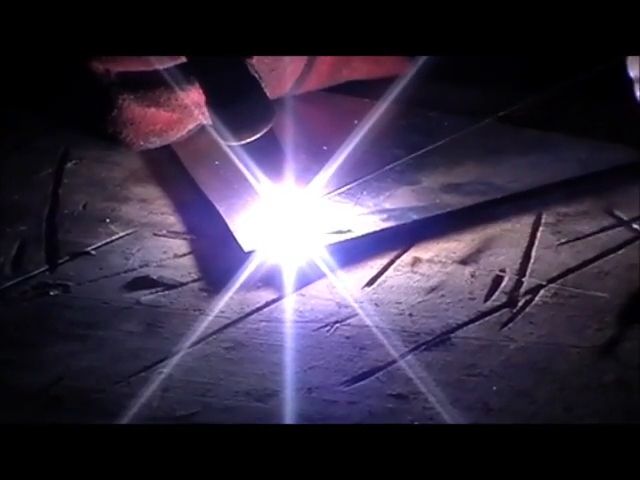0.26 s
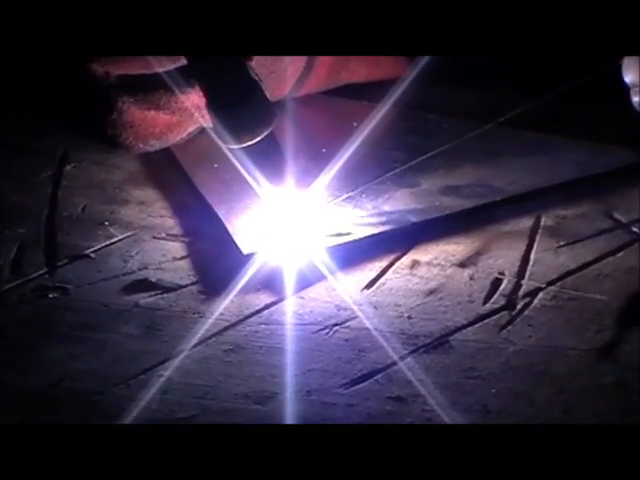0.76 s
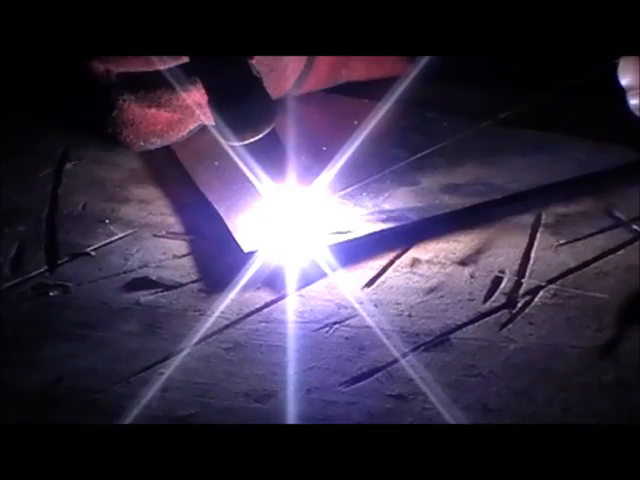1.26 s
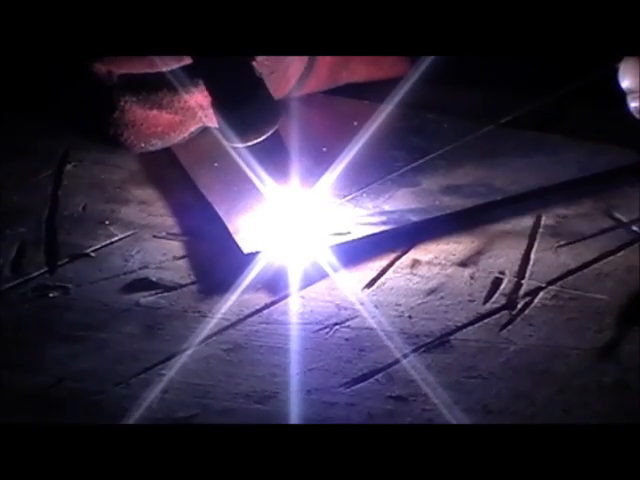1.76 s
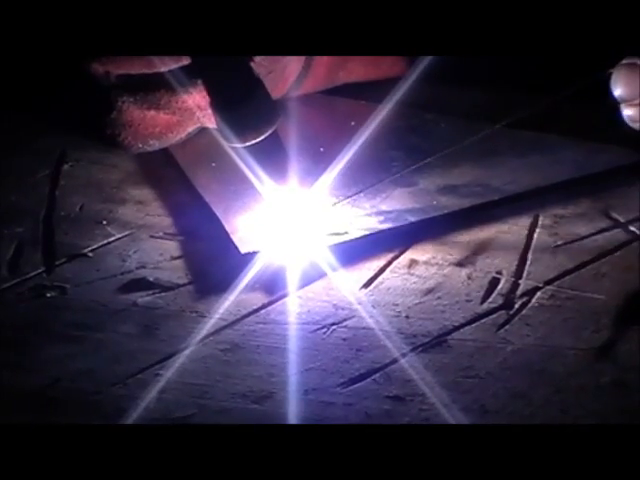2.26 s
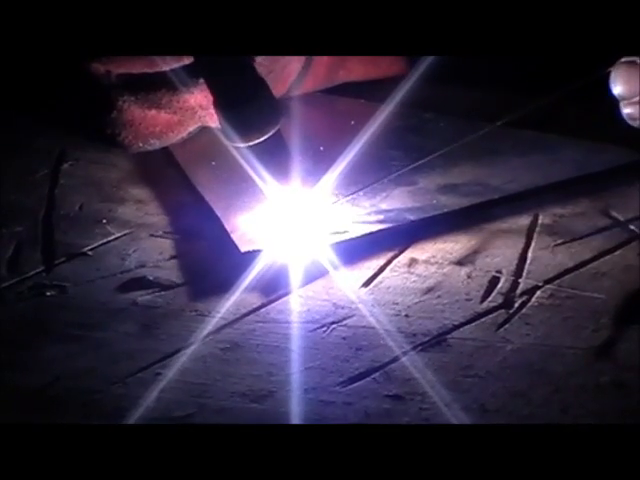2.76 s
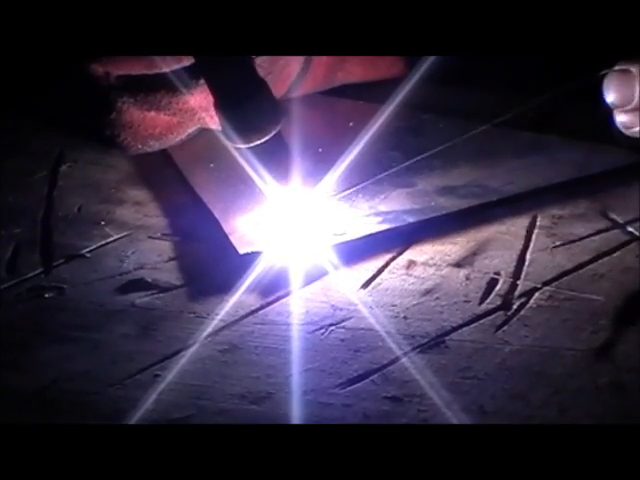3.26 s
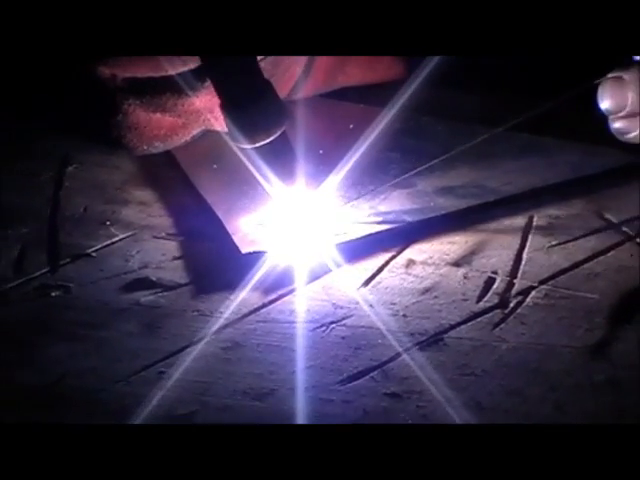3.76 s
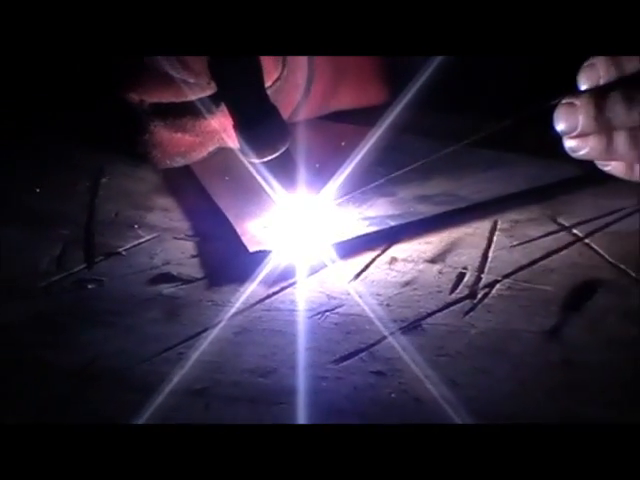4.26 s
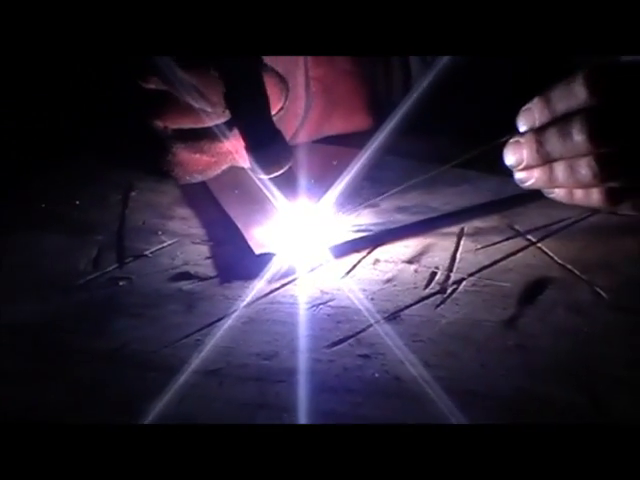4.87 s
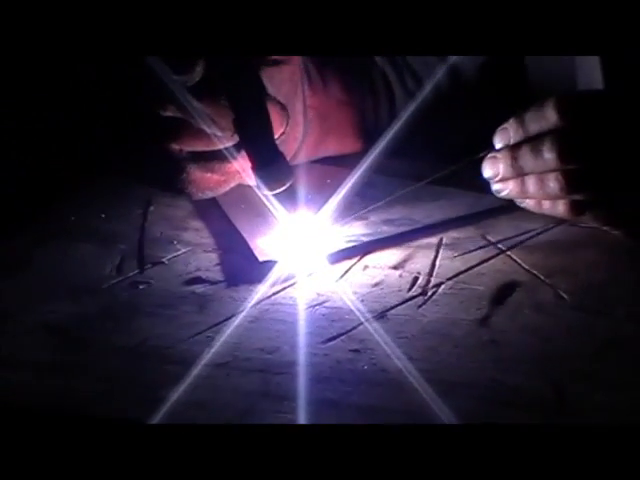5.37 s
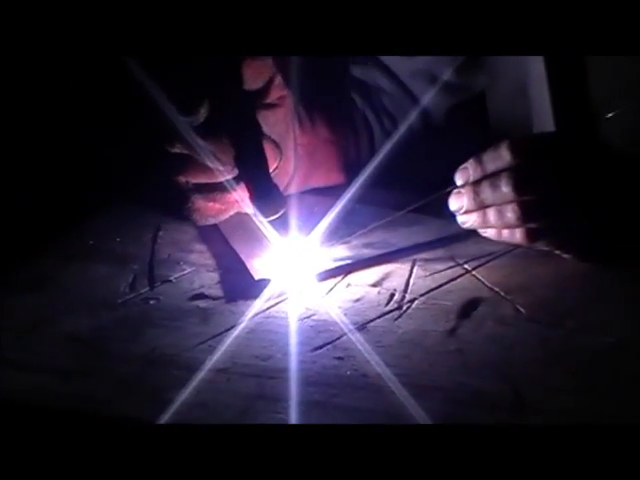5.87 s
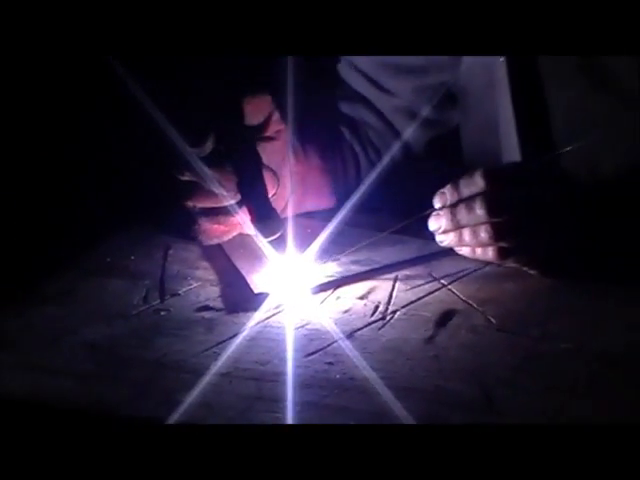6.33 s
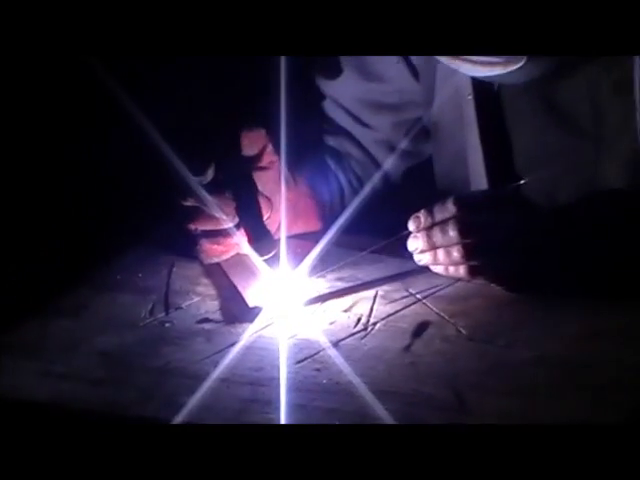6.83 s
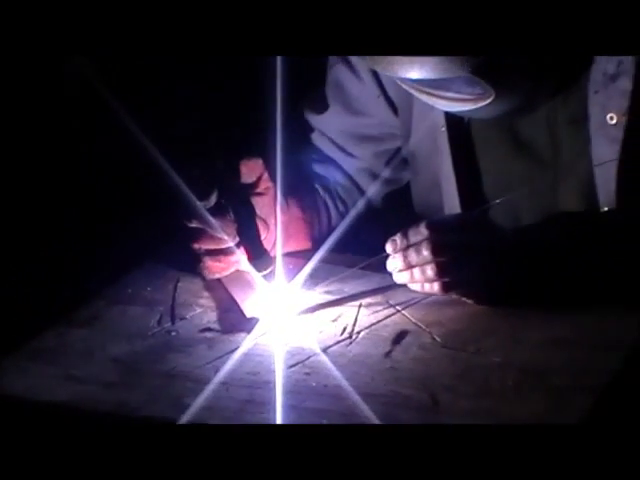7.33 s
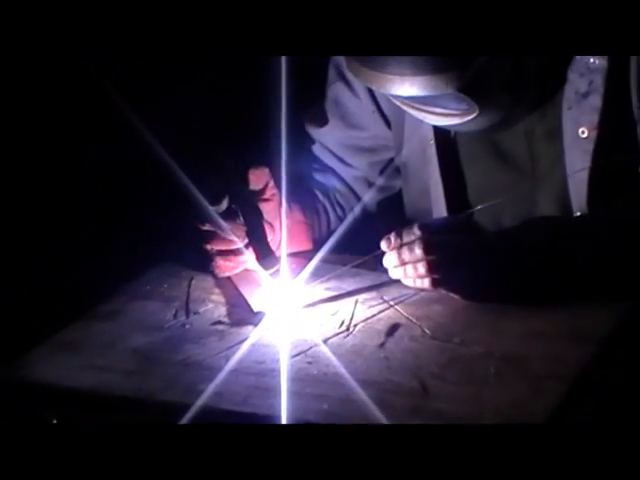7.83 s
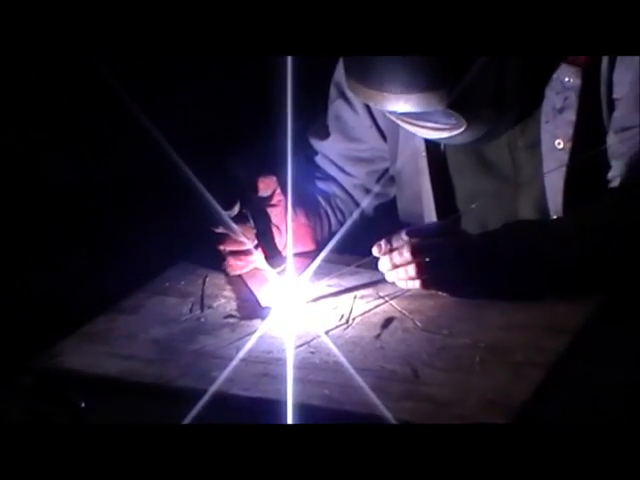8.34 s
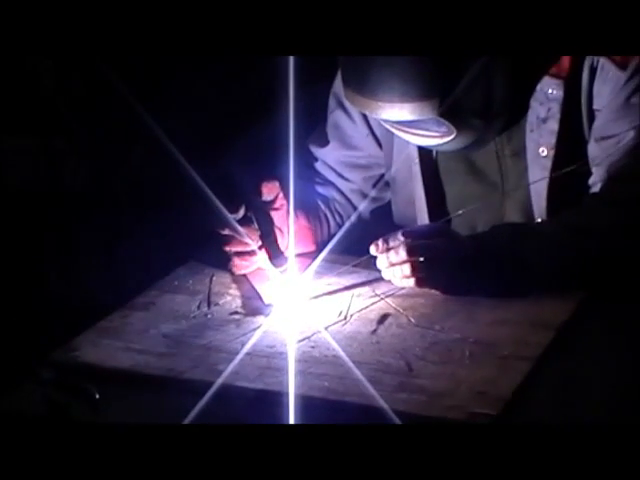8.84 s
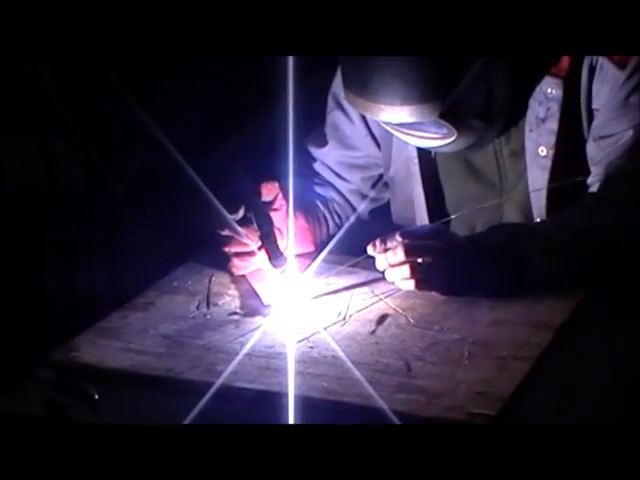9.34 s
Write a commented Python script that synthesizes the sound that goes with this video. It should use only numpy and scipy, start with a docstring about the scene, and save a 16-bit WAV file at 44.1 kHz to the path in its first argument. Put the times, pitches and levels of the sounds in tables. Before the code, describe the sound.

Already burning at the start and never stopping, a welding arc gives a loud, gritty electrical buzz with little deep bass and plenty of bright snap. It flutters gently several times a second, with scattered harder spits. Faint fan air and gas hiss lie below. The close stereo pickup is mostly centred, with short metallic workshop reverberation around it.

```python
"""An AC TIG arc buzzes on a steel bench in a workshop, heard close by in stereo.
From the start the welder's fan (shaped noise, unsteady tones) and shielding gas (shaped noise) run underneath.
The current reverses twice a cycle: first a bright, uneven crack with spark and sizzle re-lights the arc,
then two opposite edges give a steadier snap.
Bench and walls answer every pulse with decaying noise; standing waves set the low harmonics."""
import sys
import numpy as np
from scipy import signal
from scipy.fft import rfft, irfft, next_fast_len
from scipy.io import wavfile
from scipy.ndimage import map_coordinates

SR = 44100
rng = np.random.default_rng(int(sys.argv[2]) if len(sys.argv) > 2 else 0)


def log_audio(samples):
    """Write samples as a 16-bit WAV file to the path given in sys.argv[1]."""
    # one column per channel
    frames = np.atleast_2d(samples).T
    # limit to full scale, then quantise
    limited = np.clip(frames, -1, 1)
    pcm = np.round(limited * 32767).astype(np.int16)
    wavfile.write(sys.argv[1], SR, pcm)


N = 423360

ARC_HZ = 75.073
CRACK_AT_S = .00660  # re-ignition, from the start of the cycle

# relative spectrum of spark and sizzle: f/Hz, level/dB
SPARK_COLOUR = [(60, -69), (1000, -30), (3000, -17), (4800, -16.5), (5500, -4.5), (6100, -10), (6700, 2.5),
                (7300, 0.5), (8000, 2), (9500, -7.5), (15800, -30.5)]


def amp(db):
    """Amplitude factor of a level in dB."""
    return 10 ** (np.asarray(db) / 20)


def unit(x):
    """x scaled to rms 1."""
    return x / np.sqrt(np.mean(x ** 2) + 1e-20)


def along(points, hz):
    """(Hz, value) points interpolated on a log frequency axis."""
    f, v = np.transpose(points)
    return np.interp(np.log(hz + 1), np.log(f + 1), v)


def wobble(rate_hz):
    """A smooth random curve through rate_hz normal knots a second."""
    knots = rng.standard_normal(int(N * rate_hz / SR) + 4)
    return map_coordinates(knots, [np.arange(N) * rate_hz / SR])


def filtered(x, response):
    """x times a response of frequency."""
    m = next_fast_len(N + SR // 2)
    return irfft(rfft(x, m) * response(np.fft.rfftfreq(m, 1 / SR)), m)[..., :N]


def noise(spectrum):
    """Coloured noise of rms 1."""
    return unit(filtered(rng.standard_normal(N), lambda hz: amp(along(spectrum, hz))))


def pulses(times_s, sizes, colour, size=1024, order=8):
    """Sharp causal pulses of one colour, placed between samples; rms 1."""
    at = times_s[:, None] * SR
    taps = np.floor(at).astype(int) + np.arange(1 - order, order + 1)
    shape = np.sinc(taps - at) * np.sinc((taps - at) / order)  # windowed sinc
    weights = sizes[:, None] * shape
    train = np.bincount(np.clip(taps, 0, N).ravel(), weights.ravel(), N + 1)[:N]
    # folded cepstrum: minimum phase
    cepstrum = irfft(np.log(amp(along(colour, np.fft.rfftfreq(size, 1 / SR)))))
    cepstrum[1:size // 2] *= 2
    cepstrum[size // 2 + 1:] = 0
    pulse = irfft(np.exp(rfft(cepstrum)))
    return unit(signal.fftconvolve(train, pulse)[:N])


def fan(air_db, waver_hz, flutter_db):
    """The welder's cooling fan: rushing air and tones unsteady in pitch and level."""
    # relative noise density: f/Hz, level/dB
    air_spectrum = [(25, -29), (55, -26), (85, -33), (103, -3), (130, -18), (180, -4.5), (270, 1.5),
                    (400, -3.5), (640, 2.5), (900, -2), (1600, -0.5), (4000, -1), (16000, -38)]
    # tones: f/Hz, rms level/dB
    tone_levels = [(178, -60), (260, -44), (300, -73), (312, -66.5), (521.5, -50)]
    t = np.arange(N) / SR
    tones = np.zeros(N)
    for hz, db in tone_levels:
        level = amp(db + flutter_db * wobble(5.5))
        turns = hz * t + np.cumsum(waver_hz * wobble(5)) / SR
        tones += level * np.sin(2 * np.pi * turns)
    return amp(air_db) * noise(air_spectrum) + np.sqrt(2) * tones


def gas(hiss_db, flutter_db):
    """Shielding gas hisses through the hot arc: coloured noise of fluttering level."""
    # relative noise density: f/Hz, level/dB
    gas_spectrum = [(300, -30), (1000, -14.5), (1600, 3.5), (2800, 5), (4400, -5), (6500, 1), (8000, -26),
                    (10000, 1.5), (16000, -3.5)]
    return amp(hiss_db + flutter_db * wobble(12)) * noise(gas_spectrum)


def reluctance(cycle_s):
    """Force of each re-ignition (dB): throb, mains ripple, pool and scatter; now and then the arc catches hard."""
    # hardest re-ignitions: t/s, force against the usual/dB
    hard_cracks = [(0.047, 2), (0.726, 3), (1.165, 6), (1.578, 6), (3.19, 4), (5.868, 3), (6.667, 4.5),
                   (6.8, 3), (7.133, 2), (7.586, 6), (7.626, 1), (7.719, 2.5), (8.279, 4), (8.305, 3)]
    throb_db, throb_hz, first_crest_s = 1.1, 4.47, .008
    ripple_db, ripple_hz = 0.4, 100  # rectified mains, beats with the arc rate
    pool_db, pool_rate_hz = 0.8, 24  # restless weld pool
    scatter_db, usual_limit_db = 1, 0.5
    throb = throb_db * np.cos(2 * np.pi * throb_hz * (cycle_s - first_crest_s))
    ripple = ripple_db * np.cos(2 * np.pi * ripple_hz * cycle_s)
    pool = pool_db * wobble(pool_rate_hz)[(cycle_s * SR).astype(int)]
    scatter = scatter_db * rng.standard_normal(len(cycle_s))
    force = np.minimum(throb + ripple + pool + scatter, usual_limit_db)
    for when_s, hard_db in hard_cracks:
        force[np.argmin(abs(cycle_s + CRACK_AT_S - when_s))] = hard_db
    return force


def sizzle(times_s, sizes, t60_s):
    """Each spark leaves a short burst of noise while the new arc column settles; rms 1."""
    kicks = np.bincount((times_s * SR).astype(int), sizes, N)[:N]
    fading = signal.lfilter([1], [1, -amp(-60 / (t60_s * SR))], kicks)
    return unit(fading * noise(SPARK_COLOUR))


def moving_echo(x, echo_db, first_delay_s, last_delay_s):
    """Cracks and sparks bounce off the workpiece; the path grows as the torch travels along the seam."""
    delay = np.linspace(first_delay_s, last_delay_s, N) * SR
    return x + amp(echo_db) * map_coordinates(x, [np.arange(N) - delay])


def arc(crack_db, spark_db, sizzle_db, snap_db, snap_scatter_db, snap_wander_db, jitter_s, sway_s, ramp_end_db):
    """Two current reversals a cycle: a re-ignition varying in size and moment, then a steadier snap."""
    # slow drift as the torch travels: t/s, spark/dB, snap/dB, crack/dB, each against its usual level
    drift = [(0.0, 0.5, 0.3, 1.5), (0.6, -0.5, 0.1, -0.5), (1.9, 0, -0.5, -0.0), (3.1, -1, 0.34, -0.5),
             (4.6, -0.5, 0.6, 0.8), (5.0, -1.7, 0.3, 0.5), (6.3, 0.5, -0.3, 0.4), (6.7, -0.5, 1.1, -1),
             (7.1, -0.2, -1.3, 1), (7.8, -1, -0.1, -0.5), (8.4, -0.5, -0.6, -1.2), (9.05, -0.5, -1.4, 1),
             (9.3, -2, 0, 0.4), (9.6, 0, -1.9, 2)]
    # relative pulse spectra: f/Hz, level/dB
    crack_colour = [(60, -53.5), (250, -28), (700, -10), (1500, -7), (3000, -23.5), (4800, -12), (5600, -1),
                    (6100, -10), (6800, -3.5), (8000, 2.5), (9300, 3.5), (10000, -3), (12200, -0.5),
                    (15800, -15.5)]
    snap_colour = [(60, -47.5), (250, -21), (800, -18), (1700, -7.5), (2200, -3), (2800, 3.5),
                   (3400, -13.5), (4600, -17), (7000, -25.5), (8200, -3.5), (9300, -4), (10500, -13.5),
                   (12200, -10), (15800, -14)]
    snap_at_s, ramp_s = .01262, .000545  # ramp: the current's swing in the snap
    crack_gain, snap_loss = 0.69, 0.15  # dB per dB of force

    cycle = np.arange(int(N / SR * ARC_HZ)) / ARC_HZ
    s, *levels = np.transpose(drift)
    spark_drift, snap_drift, crack_drift = (np.interp(cycle, s, level) for level in levels)
    chance = rng.standard_normal((3, len(cycle)))
    sample = (cycle * SR).astype(int)
    # the torch sways in the hand, so the path to the microphone changes a little
    arrival = cycle + sway_s * wobble(1.5)[sample]

    # every re-ignition has a bright edge and, just after it, a fuller, duller spark
    force = reluctance(cycle)
    ignition = arrival + CRACK_AT_S + jitter_s * chance[0]
    crack_size = amp(crack_drift + crack_gain * force)
    spark_size = amp(spark_drift + force)
    cracks = amp(crack_db) * pulses(ignition, crack_size, crack_colour)
    spark_time = ignition + 0.00013 + 2 * jitter_s * chance[1]
    sparks = amp(spark_db) * pulses(spark_time, spark_size, SPARK_COLOUR)
    sparks = sparks + amp(sizzle_db) * sizzle(ignition, spark_size, t60_s=0.016)
    bright = moving_echo(cracks + sparks, echo_db=-13, first_delay_s=.00070, last_delay_s=.00090)

    # opposite edges at the start and the end of the current's swing
    start = arrival + snap_at_s
    wander = snap_wander_db * wobble(9)[sample]
    snap_size = amp(snap_drift - snap_loss * force + wander + snap_scatter_db * chance[2])
    edge_times = np.r_[start, start + ramp_s]
    edge_sizes = np.r_[snap_size, -amp(ramp_end_db) * snap_size]
    return bright + amp(snap_db) * pulses(edge_times, edge_sizes, snap_colour)


def echo(x, early_db, early_t60_s):
    """Dense early reflections from the bench, then the tail of the workshop: decaying noise."""
    # answer against the direct sound: f/Hz, level/dB
    reflected = [(200, 4), (1400, 1), (2100, -6), (2800, -12), (4500, 0), (7000, -5.5), (9500, -4),
                 (12000, -3.5), (15000, -3)]
    # decay of the tail: f/Hz, t60/s
    workshop = [(200, 0.095), (2500, 0.72), (8000, 0.23), (16000, 0.099)]
    hz, t, z = signal.stft(rng.standard_normal(SR // 2), SR, nperseg=256)
    decay = amp(-60 * t / along(workshop, hz)[:, None])
    tail = signal.istft(z * decay, SR, nperseg=256)[1]
    t = np.arange(len(tail)) / SR
    early = 1 + amp(early_db - 60 * t / early_t60_s)  # multiplies the tail
    tail = tail * early * (t > .0016)
    answer = signal.fftconvolve(x, tail / np.linalg.norm(tail))[:N]
    return filtered(answer, lambda hz: amp(along(reflected, hz)))


def standing_waves(x, top_db):
    """The room gives each low harmonic its own strength and leaves the sputter between them alone."""
    # harmonics: multiple of the arc rate, rms level against top_db/dB
    harmonics = [(1, -42), (2, -34.5), (3, -16.5), (4, -26.5), (5, -38), (6, -12), (7, -17), (8, -34),
                 (9, -13), (10, -17), (11, -9.5), (12, -38), (13, -8), (14, -21.5), (15, -6.5), (16, -12),
                 (17, -8.5), (18, -9), (19, -7.5), (20, -17.5), (21, -11), (22, -4.5), (23, -9), (24, -5.5),
                 (25, -9), (26, -31), (27, -12.5), (28, -13), (29, -1), (30, -23.5), (31, -2.5), (32, -5.5),
                 (33, -11), (34, -8), (35, -37), (36, -1), (37, -1), (38, -17.5), (39, -2.5), (40, -5),
                 (41, -17), (42, -7.5), (43, -5.5), (44, -7), (45, -12), (46, -14.5), (47, -34), (48, -20),
                 (49, -25), (50, -9.5)]
    spectrum, hz = rfft(x), np.fft.rfftfreq(N, 1 / SR)
    gain = np.ones(len(hz))
    for multiple, db in harmonics:
        line = abs(hz - round(multiple) * ARC_HZ) < .5
        rms = np.sqrt(2 * np.sum(abs(spectrum[line]) ** 2)) / N
        gain[line] = amp(top_db + db) / rms
    return irfft(spectrum * gain, N)


def ports(buzz, hiss, other_hiss, spread_s):
    """Two microphone ports hear different nearby reflections and hiss: side signal of opposite sign."""
    # side filter: f/Hz, gain/dB
    width = [(100, -34), (250, -30), (500, -23), (1200, -16), (2500, -23), (5000, -21), (8000, -13),
             (11000, -8), (15000, -4)]
    t = np.arange(SR // 20) / SR
    nearby = rng.standard_normal(len(t)) * np.exp(-t / spread_s)
    diffuse = signal.fftconvolve(buzz, nearby / np.linalg.norm(nearby))[:N]
    side = filtered(.7 * diffuse + 1.9 * other_hiss, lambda hz: amp(along(width, hz)))
    return np.array([buzz + hiss + side, buzz + hiss - side])


def scene():
    """Fan, gas, arc and workshop, as the two microphone ports hear them."""
    hum = fan(air_db=-32.0, waver_hz=0.87, flutter_db=1.0)
    hiss, other_hiss = (gas(hiss_db=-28.3, flutter_db=.5) for _ in range(2))
    direct = arc(crack_db=-24.5, spark_db=-29.5, sizzle_db=-33.5,
                 snap_db=-24.0, snap_scatter_db=0.57, snap_wander_db=1.14,
                 jitter_s=5e-6, sway_s=1e-5, ramp_end_db=0.5)
    reflections = echo(direct, early_db=8.0, early_t60_s=0.11)
    buzz = standing_waves(direct + reflections, top_db=-31.5)
    return ports(buzz + hum, hiss, other_hiss, spread_s=0.005)


def record(dry):
    """Clips at full scale, then removes everything above the band limit."""
    top_hz = 15780
    return filtered(np.clip(dry, -1, 1), lambda hz: hz < top_hz)


dry = scene()
out = record(dry)
log_audio(out)
```